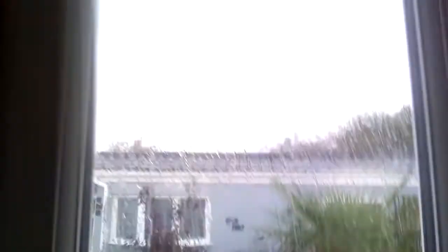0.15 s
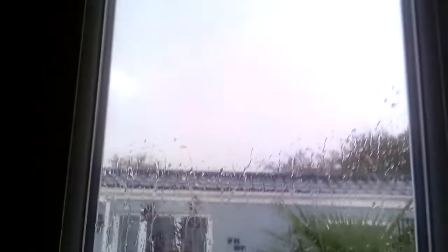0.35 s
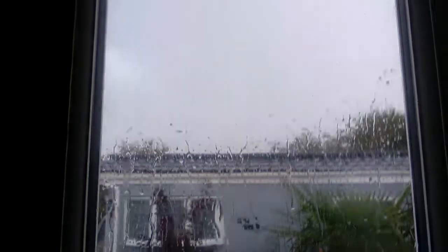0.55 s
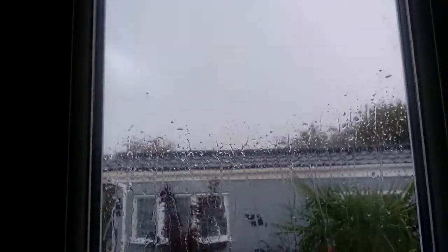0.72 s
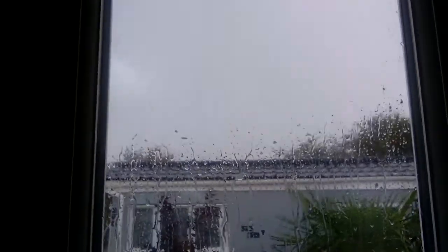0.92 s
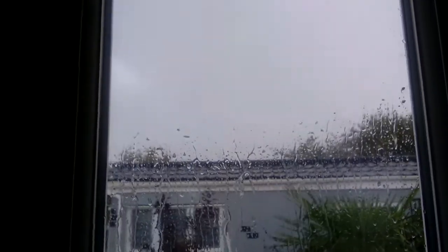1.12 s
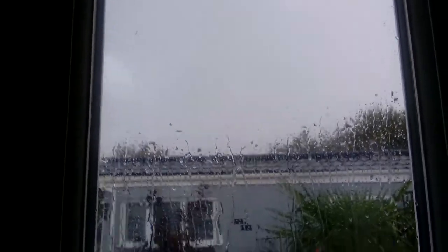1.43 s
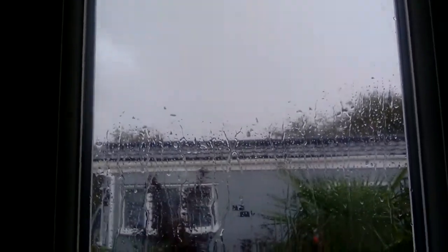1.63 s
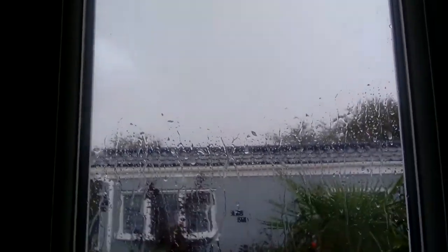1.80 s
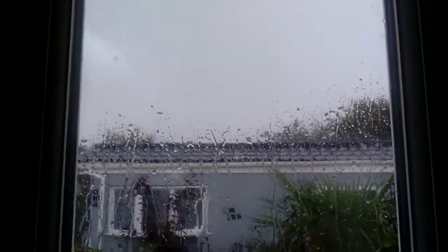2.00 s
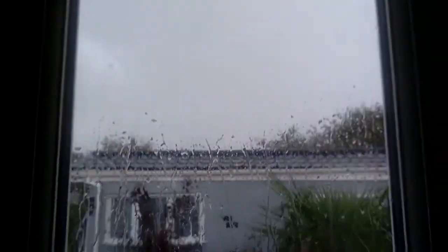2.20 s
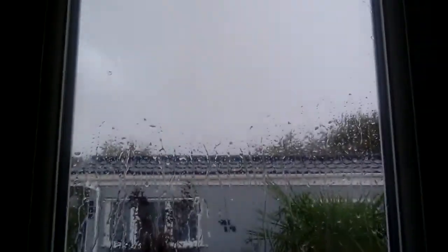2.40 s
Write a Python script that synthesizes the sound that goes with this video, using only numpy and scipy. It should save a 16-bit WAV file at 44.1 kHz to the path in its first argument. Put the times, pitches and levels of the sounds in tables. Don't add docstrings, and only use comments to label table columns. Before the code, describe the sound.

Rain drums on a closed window, dull and low through the glass, heard close indoors with slight room echo. It is strongest in the first half second, with taps and bright sill splashes. At 0.25 s a hard double knock thumps the hand-held recorder, with brief finger friction. Quieter irregular drops and soft hand rumbles follow; a clear tap at 2.05 s, sharp plastic clicks and rattles at 2.25 and 2.5 s.

```python
import sys
import numpy as np
from scipy import signal
from scipy.io import wavfile

SR = 44100
rng = np.random.default_rng(int(sys.argv[2]) if len(sys.argv) > 2 else 0)


def dump_mix(stems):
    frames = np.atleast_2d(stems).T
    limited = np.clip(frames, -1, 1)
    pcm = np.round(limited * 32767).astype(np.int16)
    wavfile.write(sys.argv[1], SR, pcm)


def linear_from_db(decibels):
    return 10 ** (np.asarray(decibels, float) / 20)


N = 112454


def rms_one(x):
    return x / np.sqrt(np.mean(x ** 2) + 1e-20)


def drift(rate):
    r = np.exp(-80 * np.pi * rate / SR)
    white = rng.standard_normal(N // 40 + 2002)
    slow = signal.lfilter([1], [1, -2 * r, r * r], white)[2000:]
    return np.interp(np.arange(N) / 40, np.arange(len(slow)), rms_one(slow))


def peak(x, hz, width_hz):
    r = np.exp(-np.pi * width_hz / SR)
    top = np.array([1, 0, -1]) * (1 - r * r) / 2
    return signal.lfilter(top, [1, -2 * r * np.cos(2 * np.pi * hz / SR), r * r], x + 1e-18)


def band_pass(x, order, low_hz, high_hz):
    return signal.sosfilt(signal.butter(order, [low_hz, high_hz], "band", fs=SR, output="sos"), x)


def add(out, s, piece):
    i = int(s * SR)
    out[i:i + len(piece)] += piece[:N - i]


def struck(hz, t60, rise_s):
    t = np.arange(int(t60 * SR)) / SR
    return np.sin(2 * np.pi * hz * t) * (1 - np.exp(-t / rise_s)) * linear_from_db(-60 * t / t60)


# t/s, level/dB
DOWNPOUR = [(0.0, -43.5), (0.16, -50), (0.3, -41), (0.43, -49.5), (0.58, -56), (0.76, -56), (0.9, -56.5),
            (1.16, -56.5), (1.31, -56), (1.43, -52), (1.55, -51.5), (1.68, -53), (1.79, -54.5), (1.87, -50),
            (1.95, -49.5), (2.1, -47.5), (2.32, -53.5), (2.55, -55)]
# f/Hz, level/dB (per Hz)
THROUGH_GLASS = [
    (60, -22),
    (140, 1),
    (300, -8.5),
    (500, -8),
    (900, -14),
    (2250, -25.5),
    (4200, -40.5),
    (6000, -59),
]
# f/Hz, width/Hz, level/dB
PANE_TONES = [
    (143.3, 96, 0),
    (270.4, 61, -0.5),
    (326.1, 32, -2),
    (690, 140, -3),
    (857, 28, -11.5),
    (960, 71, -6),
    (1284, 170, -14),
    (1555, 87, -16.5),
    (1942, 140, -21.5),
    (2763, 360, -19),
]
DROPS_PER_S, DROP_SPREAD_DB = 1100, 2.6
DRUM_DB, WASH_DB = -2, -4.5
BRIGHTENS = 0.24
DEAD_HZ, DEAD_WIDTH_HZ, DEAD_SHARE = 494, 109, 0.58


def rain():
    pour_db = np.interp(np.arange(N) / SR, *np.transpose(DOWNPOUR))
    swing_db = pour_db - pour_db.mean()
    drum, wash = 0, 0
    for hz, width_hz, db in PANE_TONES:
        sizes = linear_from_db(DROP_SPREAD_DB * np.minimum(rng.exponential(1, N), 4)) * rng.choice([-1, 1], N)
        drops = sizes * (rng.random(N) < DROPS_PER_S * hz / 4000 / SR)
        ring = rms_one(peak(peak(drops, hz, width_hz), hz, 2 * width_hz))
        drum = drum + linear_from_db(db + BRIGHTENS * swing_db * (hz > 1200)) * ring
    edges = 70 * 2 ** np.arange(0, 6.6, .333)
    white = rng.standard_normal((2, N))
    points = np.array(THROUGH_GLASS)
    for k, (low, high) in enumerate(zip(edges, edges[1:])):
        band = band_pass(white[k % 2], 2, low, high)
        db = np.interp(np.log(low * high) / 2, np.log(points[:, 0]), points[:, 1])
        wash = wash + band * linear_from_db(db + 2.5 * drift(9) + BRIGHTENS * swing_db * (low > 1200))
    both = linear_from_db(DRUM_DB) * rms_one(drum) + linear_from_db(WASH_DB) * rms_one(wash)
    return linear_from_db(pour_db) * (both - DEAD_SHARE * peak(both, DEAD_HZ, DEAD_WIDTH_HZ))


# t/s, level/dB (peak), f/Hz, ring t60/s
BIG_DROPS = [(.0005, -39, 291, 0.039), (0.0849, -35.5, 1115, 0.017), (.108, -39, 710, 0.031),
             (.165, -47.5, 1130, 0.026), (.200, -41.5, 687, 0.041), (0.2367, -35.5, 2084, 0.0086),
             (0.533, -48.5, 305, 0.071), (0.573, -48, 258.6, 0.13), (0.589, -64.5, 1960, 0.032),
             (.651, -57, 922, 0.039), (.817, -51, 960, 0.03), (0.815, -60, 1420, 0.036),
             (1.027, -58, 903, 0.058), (1.107, -54, 690, 0.034), (1.341, -47, 270, 0.11),
             (1.343, -56, 780, 0.033), (1.409, -48.5, 990, 0.0084), (1.504, -47, 634, 0.024),
             (1.657, -52, 801, 0.084), (1.834, -51.5, 780, 0.066), (1.846, -53.5, 1400, 0.023),
             (2.0535, -37, 1670, 0.0078), (2.052, -46, 680, 0.073),]
# t/s, level/dB (peak), f/Hz
PATTER_DROPS = [(0.501, -47.5, 614), (0.568, -50.5, 714), (0.684, -49.5, 926), (0.879, -54, 600),
                (0.905, -52, 673), (1.188, -48, 763), (1.233, -49, 756), (1.376, -50, 690),
                (1.442, -44.5, 660), (1.461, -49, 947), (1.484, -47.5, 910), (1.547, -46, 706),
                (1.598, -45.5, 910), (1.614, -43.5, 653), (1.751, -49.5, 855), (1.852, -40, 661),
                (1.966, -50.5, 880), (2.134, -44, 693), (2.169, -45, 1015)]
PATTER_DB, PATTER_T60_S = -8.5, 0.05
TAP_OVERTONE, TAP_OVERTONE_DB = 1.25, -13.5


def taps():
    rows = BIG_DROPS + [(s, db + PATTER_DB, hz, PATTER_T60_S) for s, db, hz in PATTER_DROPS]
    out = np.zeros(N)
    for (s, db, hz, t60), chance in zip(rows, rng.uniform(1.0, 1.05, len(rows))):
        over = linear_from_db(TAP_OVERTONE_DB) * struck(hz * TAP_OVERTONE * chance, t60, t60 / 14)
        add(out, s, linear_from_db(db + 15) * (struck(hz, t60, t60 / 8) - over))
    return out


# t/s, level/dB (peak), f/Hz, burst t60/s, spray level/dB
SILL_SPLASHES = [(0.075, -58, 5630, 0.023, -17), (0.079, -57.5, 11140, 0.014, -45),
                 (0.077, -48.5, 2480, 0.036, -15), (0.079, -52, 3610, 0.026, -18),
                 (0.08, -45, 1660, 0.017, -14), (0.206, -47.5, 6500, 0.007, -24),
                 (.198, -55, 5400, 0.024, -30), (0.2062, -43.5, 4000, 0.012, -13),
                 (0.2067, -39, 2910, 0.0075, -19), (.237, -46, 3200, 0.0065, -35),
                 (0.236, -48, 4900, 0.0099, -36), (0.570, -71.5, 4130, 0.028, -6),
                 (.570, -79, 5470, .012, -28), (.6485, -47.5, 3480, 0.022, -18),
                 (0.648, -56, 4160, 0.019, -17), (1.984, -61, 3187, 0.025, -8.5),
                 (2.0524, -55.5, 5760, 0.016, -18.5), (2.055, -66, 6700, 0.036, -24),
                 (2.053, -69, 7700, 0.0068, -30), (2.053, -71, 8600, 0.0056, -31),
                 (2.054, -62.5, 3600, 0.062, -22), (2.053, -69, 4600, .04, -21)]
SPRAY_WIDTHS = [
    800,
    600,
]
SPLASH_WIDTH_HZ, SPRAY_T60_S = 800, .5


def splashes():
    out, t = np.zeros(N), np.arange(SR // 2) / SR
    for s, db, hz, t60, spray_db in SILL_SPLASHES:
        white = rng.standard_normal((2, len(t)))
        burst = white[0] * linear_from_db(-60 * t / t60) * (1 - np.exp(-t * 10 / t60))
        burst = band_pass(burst, 3, hz - SPLASH_WIDTH_HZ / 2, hz + SPLASH_WIDTH_HZ / 2)
        width_hz = SPRAY_WIDTHS[int(hz > 5000)]
        spray = rms_one(band_pass(white[1], 3, hz - width_hz / 2, hz + width_hz / 2))
        spray = spray * linear_from_db(spray_db - 60 * t / SPRAY_T60_S)
        add(out, s, linear_from_db(db + 10.0) * (burst / np.abs(burst).max() + spray / 2))
    return out


# t/s, level/dB
KNOCK_BLOWS = [
    (.2458, -13),
    (.2676, -18),
]
# f/Hz, level/dB, t60/s
KNOCK_TONES = [
    (81, 0, 0.059),
    (174, -6, 0.052),
    (270, -15.5, 0.094),
    (377, -14.5, 0.058),
    (859, -10.5, 0.041),
    (1270, -12.5, 0.025),
    (1936, -18, 0.032),
]
# t/s, length/s, level/dB
KNOCK_GRIT = [
    (0.2461, 0.01166, -28.5),
    (0.263, 0.0158, -39),
]
GRIT_HZ, GRIT_TOP_HZ = 2560, 6500
SWING_S, SWING_HZ, SWING_DB = .2397, 55, -11.5
SWING_RISE_S, SWING_LENGTH_S = .012, .047


def knock():
    out = np.zeros(N)
    for k, (s, db) in enumerate(KNOCK_BLOWS):
        for hz, level_db, t60 in KNOCK_TONES:
            t = np.arange(int(t60 * SR)) / SR
            rise_s = 0.0003 + 0.0003 * k
            swing = -np.cos(2 * np.pi * hz * t) * (1 - np.exp(-t / rise_s))
            add(out, s, linear_from_db(db + level_db + 3.5) * swing * linear_from_db(-60 * t / t60))
    for s, length, db in KNOCK_GRIT:
        n = int(length * SR)
        grains = rng.standard_normal(SR) * linear_from_db(4.7 * np.minimum(rng.exponential(1, SR), 3))
        dull = rms_one(band_pass(grains, 2, 750, GRIT_HZ))
        dull = signal.sosfilt(signal.butter(6, GRIT_TOP_HZ, fs=SR, output="sos"), dull)
        add(out, s, linear_from_db(db) * signal.windows.tukey(n, .15) * dull[:n])
    t = np.arange(int(2 * SWING_LENGTH_S * SR)) / SR
    shape = (1 - np.exp(-(t / SWING_RISE_S) ** 2)) * np.exp(-(t / SWING_LENGTH_S) ** 3)
    add(out, SWING_S, -linear_from_db(SWING_DB) * np.sin(2 * np.pi * SWING_HZ * t) * shape)
    return out


# t/s, level/dB (peak), hollow part level/dB
SHELL_CLICKS = [(2.2495, -50, -8), (2.2514, -15, -6), (2.2520, -13, -3), (2.2549, -21, -12),
                (2.2557, -15, -5), (2.2574, -21, -12), (2.2825, -43, -24), (2.2902, -33, -24),
                (2.2923, -37, -14), (2.319, -52, -24), (2.384, -52, -20), (2.4862, -46, -26),
                (2.4892, -26, -25), (2.4912, -27, -25), (2.4968, -25, -26), (2.4995, -34, -22),
                (2.5037, -39, -26), (2.5065, -33, -28), (2.5190, -26, -16), (2.5201, -21, -7),
                (2.5213, -24, -8)]
# t/s, first level/dB, gap/s, loss/dB per touch
SHELL_RATTLES = [
    (2.2593, -20, .00108, 1.7),
    (2.5228, -27, .0012, 1.8),
]
# f/Hz, level/dB
SHELL_TONES = [
    (5200, -4.5),
    (5800, -11.5),
    (6600, -0.5),
    (8100, -0.5),
    (10600, -5.5),
    (13500, -13.5),
]
SHELL_Q = 6.5
SOFT_DULLS = .8
HOLLOW_HZ, HOLLOW_WIDTH_HZ, HOLLOW_LAG_S = 3400, 850, .0008


def shell():
    rows = list(SHELL_CLICKS)
    for s, db, gap, loss_db in SHELL_RATTLES:
        for k in range(7):
            rows.append((s + gap * k * rng.uniform(.98, 1.02), db - loss_db * k, -12))
    s, db, hollow_db = np.transpose(rows)
    softer_db = db - db.max()
    out, bare = 0, np.zeros(N)
    at = (s * SR).astype(int)
    bare[at] = linear_from_db(db) * rng.choice([-1, 1], len(s))
    deep_db = 2 * hollow_db - 5.5 + 0.61 * softer_db
    tones = [(HOLLOW_HZ, HOLLOW_WIDTH_HZ, hollow_db), (HOLLOW_HZ / 2, HOLLOW_WIDTH_HZ, deep_db)]
    tones += [(hz, hz / SHELL_Q, d) for hz, d in SHELL_TONES]
    for k, (hz, width_hz, level_db) in enumerate(tones):
        clicks = np.zeros(N)
        dull_db = SOFT_DULLS * softer_db * max(np.log2(hz / 6000), 0)
        strength = linear_from_db(db + level_db + dull_db + rng.normal(0, 1.5, len(s)))
        late = HOLLOW_LAG_S * (k == 0)
        clicks[((s + late) * SR).astype(int)] = strength * np.sign(bare[at]) * (-1) ** k
        out = out + peak(peak(clicks, hz, width_hz), hz, width_hz) * SR / (3 * width_hz)
    return out, peak(bare, 4000, 12000) * 4


# t/s, length/s, level/dB
FINGER_SLIDES = [(0.192, .011, -59), (0.206, .005, -45), (0.211, .039, -54), (0.246, .014, -65),
                 (0.2614, .003, -55), (0.263, .011, -61), (0.2732, 0.0033, -52), (0.277, 0.0065, -69),
                 (0.076, .008, -57), (0.879, 0.0073, -70.5), (0.914, 0.011, -70), (2.053, 0.0033, -71)]


def slides():
    out = np.zeros(N)
    for s, length, db in FINGER_SLIDES:
        n = int(length * SR)
        add(out, s, linear_from_db(db) * signal.windows.tukey(n, .3) * rng.standard_normal(n))
    return signal.lfilter([1, -.8], [1], out * linear_from_db(3.0 * drift(150)))


# t/s, level/dB (peak), f/Hz, length/s
HAND_BUMPS = [(0.329, -28, 74, 0.05), (0.362, -30, 49, 0.039), (0.46, -42, 56, 0.016),
              (.525, -43, 50.7, 0.024), (1.43, -51, 132, 0.023), (1.48, -48, 134, 0.035),
              (0.931, -41.5, 121, 0.027), (1.034, -47, 73, 0.022), (1.162, -32, 70, 0.023),
              (1.22, -40, 49, 0.048), (1.591, -30.5, 57.5, 0.024), (1.644, -38.5, 131, 0.014),
              (1.658, -43, 55, 0.038), (1.189, -40, 91, 0.014), (0.167, -47, 50.3, .04),
              (1.735, -35, 91, 0.013), (1.762, -40, 79.4, 0.032), (1.855, -31, 51.3, 0.026),
              (1.91, -34, 66, 0.029), (1.955, -37.5, 108, 0.014), (1.979, -34, 60, 0.051),
              (2.068, -36, 48, 0.04)]
# t/s, level/dB
HAND_RUMBLE = [(0, -71), (.08, -83), (.17, -60), (.4, -44), (.48, -54), (.62, -65), (.72, -70.5),
               (.9, -64.5), (1.14, -53), (1.3, -56), (1.4, -71), (1.5, -69), (1.75, -48.5), (2.1, -52.5),
               (2.2, -66), (2.33, -74), (2.45, -75.5), (2.55, -64.5)]
RUMBLE_DB, RUMBLE_HZ = 0, 50


def bumps():
    white = rng.standard_normal(N)
    rumble = rms_one(peak(peak(white, RUMBLE_HZ, 50.0), RUMBLE_HZ, 66.0))
    hand_db = np.interp(np.arange(N) / SR, *np.transpose(HAND_RUMBLE))
    out = linear_from_db(RUMBLE_DB + hand_db + 4.4 * drift(8)) * rumble
    for s, db, hz, length in HAND_BUMPS:
        t = np.arange(int(2 * length * SR)) / (length * SR)
        shape = 6 * t * np.exp(-(2.88 * t) ** 1.6 - .3)
        add(out, s, linear_from_db(db + 5.5) * np.sin(2 * np.pi * hz * length * t) * shape)
    return out


ROOM_T60_S, ROOM_HIGH_T60_S, ROOM_SPLIT_HZ = .62, .6, 6000


def room(x):
    t = np.arange(SR) / SR
    white = rng.standard_normal(SR)
    low = signal.sosfilt(signal.butter(1, ROOM_SPLIT_HZ, fs=SR, output="sos"), white)
    tail = low * linear_from_db(-60 * t / ROOM_T60_S) + (white - low) * linear_from_db(-60 * t / ROOM_HIGH_T60_S)
    tail = tail * (1 - np.exp(-t / .006))
    return signal.fftconvolve(x, tail / np.sqrt(np.sum(tail ** 2)))[:N]


TAP_WET_DB, KNOCK_WET_DB, CLICK_WET_DB, SLIDE_WET_DB = -7, -21, -23, -14.5


def scene():
    tap, blow, slide = taps(), knock(), slides()
    click, touch = shell()
    to_room = linear_from_db(TAP_WET_DB) * tap + linear_from_db(SLIDE_WET_DB) * slide + linear_from_db(CLICK_WET_DB) * touch
    to_room = to_room + linear_from_db(KNOCK_WET_DB) * np.diff(blow, prepend=0)
    return (rain() + tap + splashes() + blow + click + slide + bumps() + room(to_room))[None]


def roll_off(x):
    return signal.sosfilt(signal.butter(12, 15210, fs=SR, output="sos"), x)


HISS_DB, HISS_TILT, HISS_TOP_HZ, CUTOFF_HZ = -84, 0.18, 14500, 15600


def record(dry):
    hiss = linear_from_db(HISS_DB + 3) * signal.lfilter([1, -HISS_TILT], [1], rng.standard_normal(dry.shape))
    hiss = signal.sosfilt(signal.cheby2(12, 40, HISS_TOP_HZ, fs=SR, output="sos"), hiss)
    cut = signal.sosfilt(signal.cheby2(6, 40, CUTOFF_HZ, fs=SR, output="sos"), dry) + hiss
    bass_cut = signal.butter(2, 26, "high", fs=SR, output="sos").repeat(2, axis=0)
    return roll_off(signal.sosfilt(bass_cut, cut))


dry = scene()
out = record(dry)
dump_mix(out)
```